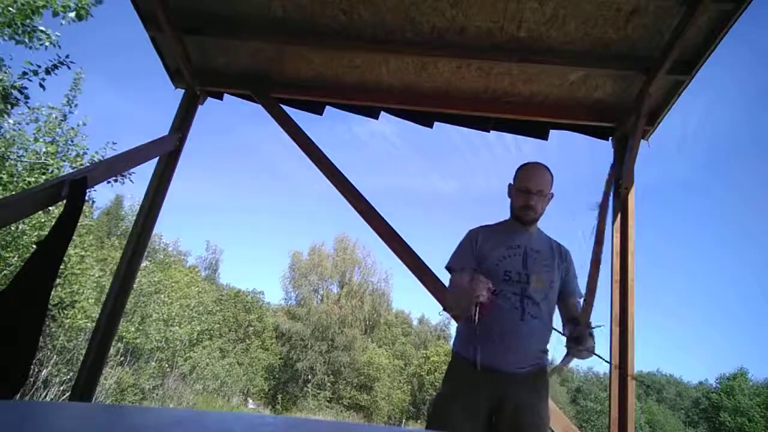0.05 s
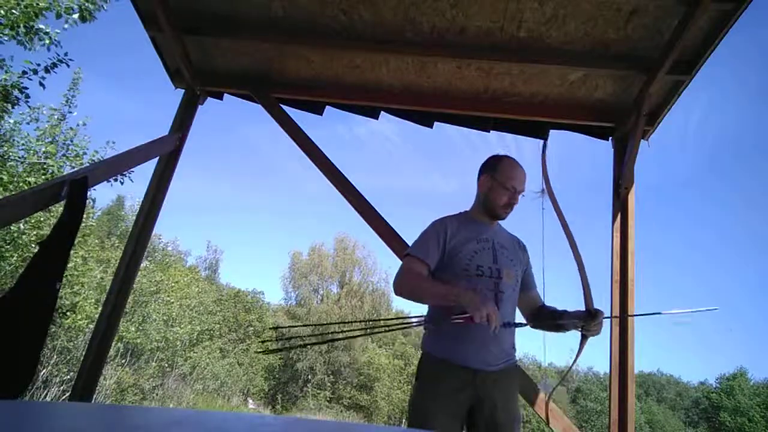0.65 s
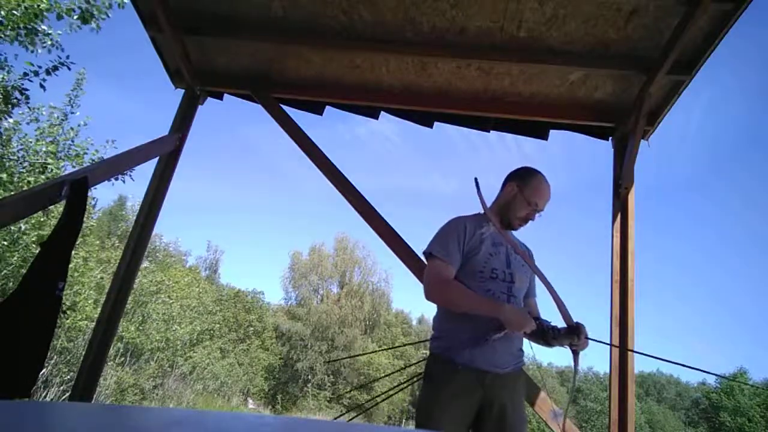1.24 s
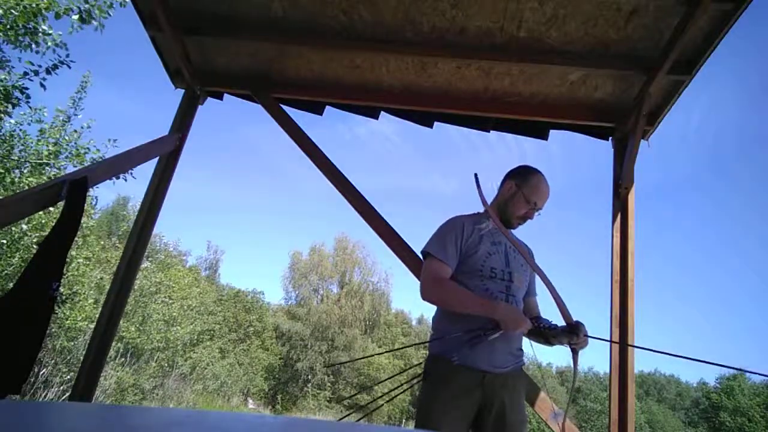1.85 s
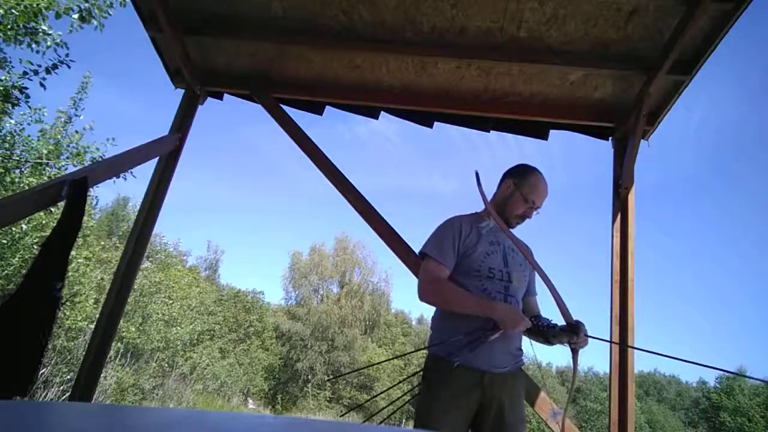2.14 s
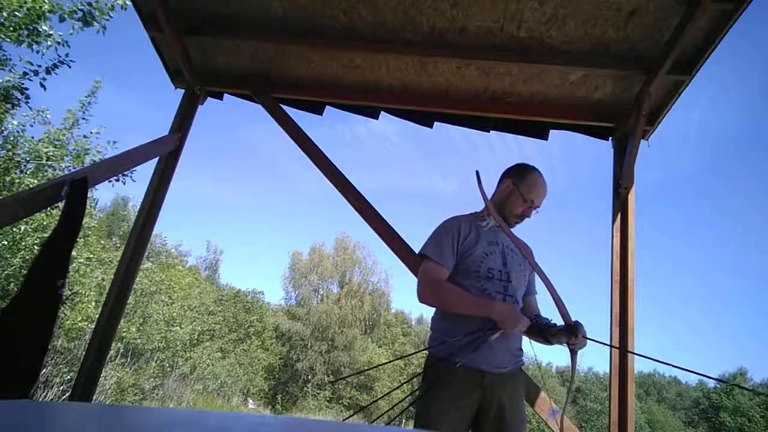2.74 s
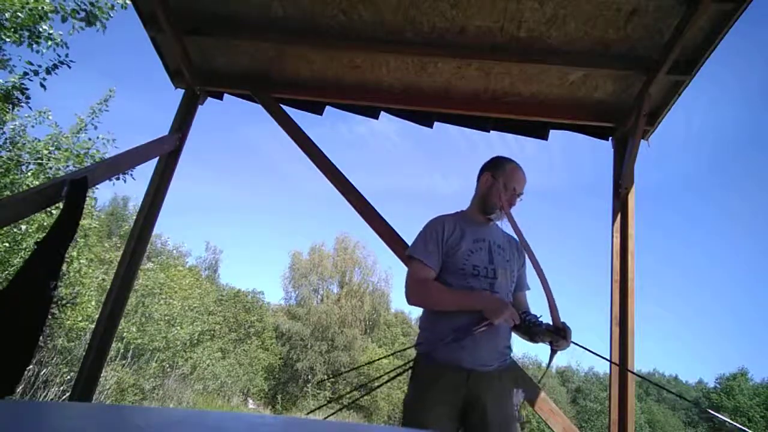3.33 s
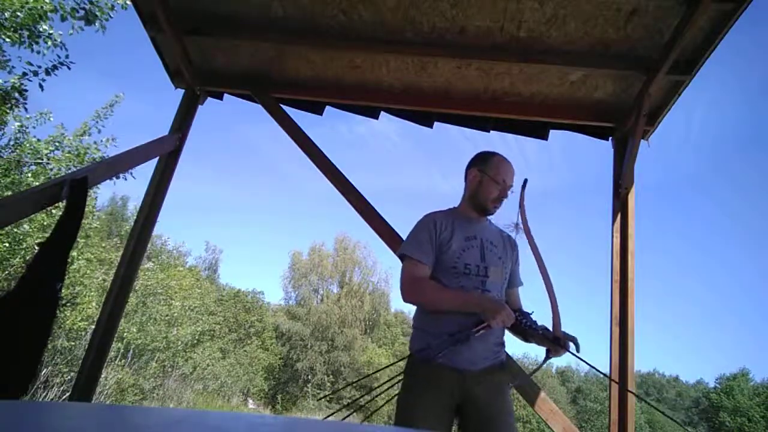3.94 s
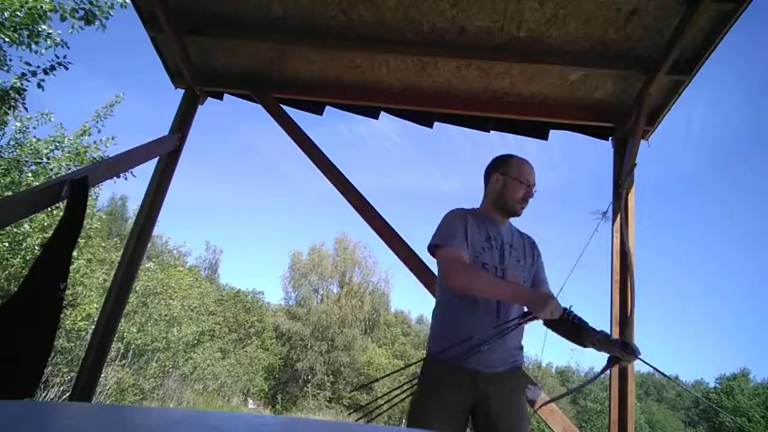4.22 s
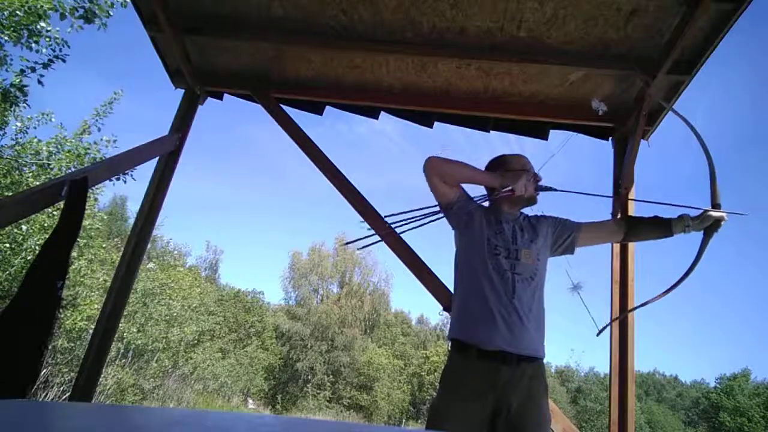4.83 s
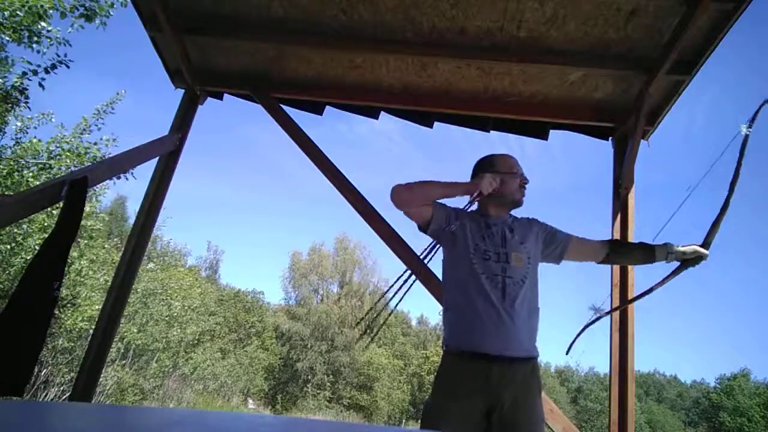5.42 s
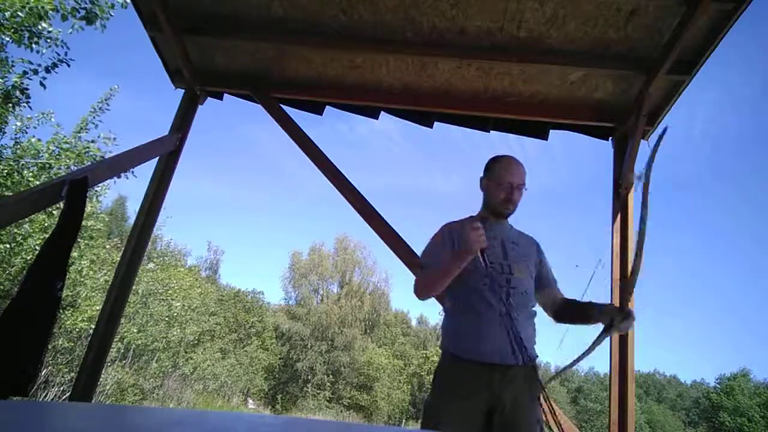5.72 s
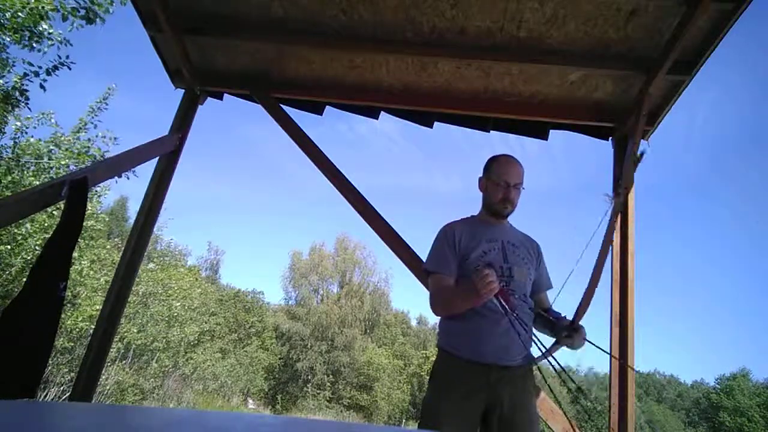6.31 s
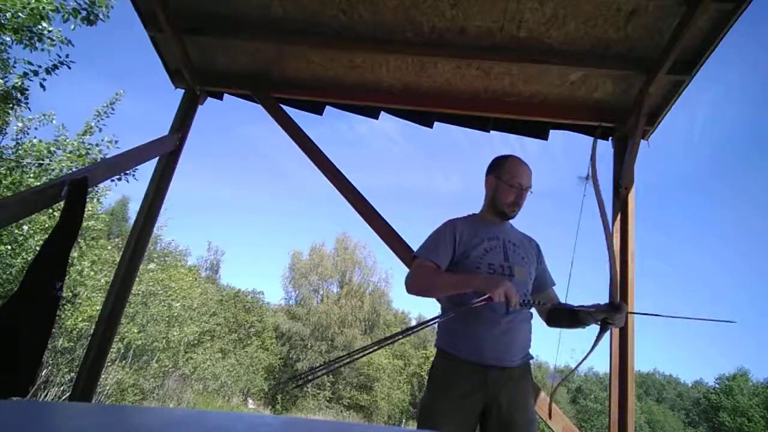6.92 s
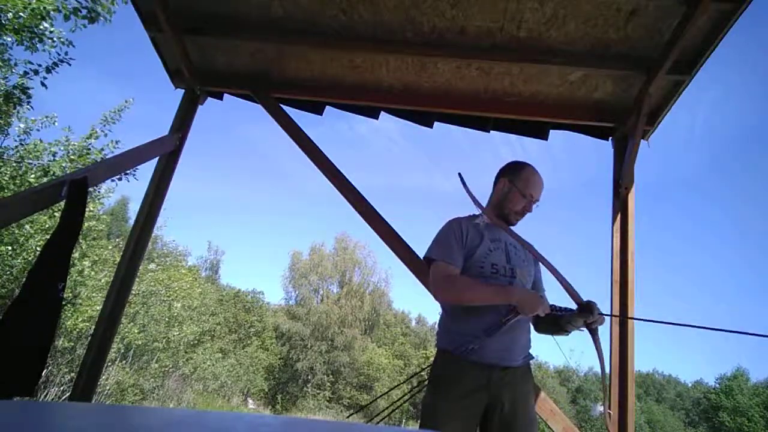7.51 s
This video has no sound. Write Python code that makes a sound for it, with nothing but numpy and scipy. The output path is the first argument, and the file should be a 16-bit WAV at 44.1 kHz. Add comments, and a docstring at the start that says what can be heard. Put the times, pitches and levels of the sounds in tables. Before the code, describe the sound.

An archer handles clicking arrows and shoots, the string slapping just before the hit, over faint birdsong and distant traffic.

```python
"""First come the clicks of spare arrows and the rustle of an archer's clothes, over far traffic and leaves.
A warbler whistles in the trees, with a fainter bird behind it. About five seconds in, he shoots from
under a wooden shelter: the string slaps, the bow rings, the feathers hiss and the arrow cracks into
a near target. The forest returns a dull echo. He takes the next arrow as a far engine picks up speed."""
import sys
import numpy as np
from scipy import signal
from scipy.fft import rfft, irfft, next_fast_len
from scipy.io import wavfile
from scipy.ndimage import uniform_filter1d

SR = 44100
rng = np.random.default_rng(int(sys.argv[2]) if len(sys.argv) > 2 else 0)


def pcm_store(signal):
    """Save signal as 16-bit PCM."""
    levels = np.round(np.clip(np.atleast_2d(signal), -1, 1) * 32767)
    wavfile.write(sys.argv[1], SR, levels.astype(np.int16).T)


N = 333468
TIME = np.arange(N) / SR
FFT_SIZE = next_fast_len(N, real=True)
FFT_HZ = np.fft.rfftfreq(FFT_SIZE, 1 / SR)


def gain_of(db):
    """Turns decibels into a number to multiply by."""
    return 10 ** (np.asarray(db) / 20)


def evened(x):
    """Scales a signal to an average (rms) level of 1."""
    return x / np.sqrt(np.mean(x ** 2) + 1e-20)


def look_up(points, hz):
    """Reads a table at any pitch, sliding between its rows."""
    pitch_hz, value = np.transpose(points)
    return np.interp(np.log(hz + 1), np.log(pitch_hz + 1), value)


def add(mix, start_s, sound):
    """Mixes a sound in at its start time."""
    part = mix[..., max(round(start_s * SR), 0):][..., :sound.shape[-1]]
    part += sound[..., :part.shape[-1]]


def panned(db):
    """Left and right gains; positive is to the left."""
    return gain_of([[db / 2], [-db / 2]])


def tinted(x, colour):
    """Makes each pitch louder or softer, as a colour table says."""
    return irfft(rfft(x, FFT_SIZE) * gain_of(look_up(colour, FFT_HZ)), FFT_SIZE)[..., :N]


def shortest_click(db):
    """The shortest click with these levels, from 0 Hz to half the sample rate."""
    log_gain = np.log(gain_of(np.r_[db, db[-2:0:-1]]))
    return np.fft.ifft(np.exp(np.conj(signal.hilbert(log_gain)))).real


# How alike left and right are (1 is the same): pitch_hz, likeness
LIKENESS = [(60, 0.99), (150, 0.85), (380, 0.83), (950, 0.15), (2380, -0.091), (5980, -0.17),
            (15000, -0.04)]
def wide_noise(colour):
    """Noise from all around, most alike on both sides in the bass."""
    left, other = rfft(rng.standard_normal((2, FFT_SIZE)))
    same = np.clip(look_up(LIKENESS, FFT_HZ), -1, 1)
    right = same * left + np.sqrt(1 - same ** 2) * other
    return evened(tinted(irfft(np.array([left, right]), FFT_SIZE), colour))


# The colours of traffic and of leaves: pitch_hz, level_db
TRAFFIC_COLOUR = [(22, -39.5), (32, -27), (42, -7.5), (60, 1), (90, -5), (130, -6.5), (170, -11),
                  (250, -16), (450, -18), (650, -17), (1000, -19.5), (1250, -25.5), (1550, -36.5),
                  (2200, -37.5), (3500, -69)]
LEAF_COLOUR = [(600, -7), (1500, -3.5), (2500, 3), (4000, 2), (7000, -5), (11000, -6.5), (16000, -2)]
# The shape of the traffic's rise and fall: time_s, level_db
TRAFFIC_SWELL = [(0.06, -64), (0.11, -57), (0.65, -62), (2.97, -60.5), (5.1, -63.5)]
def traffic_and_leaves(traffic_db=-48.5, swell_share=0.6, leaves_db=-66):
    """Far traffic swells gently under a faint hiss of leaves."""
    level_db = np.interp(TIME, *np.transpose(TRAFFIC_SWELL))
    swell_db = swell_share * (level_db - level_db.mean())
    traffic = gain_of(traffic_db + swell_db) * wide_noise(TRAFFIC_COLOUR)
    return traffic + gain_of(leaves_db) * wide_noise(LEAF_COLOUR)


ENGINE_START_S, ENGINE_ONSET_S, ENGINE_PEAK_S = 6.13, .42, 7.32
GROW_DB_PER_S, FADE_DB_PER_S = 14.5, 25
# The colours of the exhaust pipe and of the engine's roar: pitch_hz, level_db
EXHAUST_COLOUR = [(50, -4), (75, 1), (110, -18.5), (150, -14.5), (185, -19.5), (240, -32), (420, -27.5),
                  (650, -19)]
ROAR_COLOUR = [(100, -16), (300, -19), (420, -18), (500, -2), (560, -10.5), (640, 3), (740, -8.5),
               (900, -12.5), (1400, -29), (3000, -56)]
def engine(firing_hz=67.3, octaves_per_s=0.55, level_db=-36, roar_db=-17, flutter_db=3, harmonics=7):
    """A far engine fires ever faster; its tones climb through the pitches where the exhaust rings."""
    t = TIME - ENGINE_PEAK_S
    hz = firing_hz * 2 ** (octaves_per_s * t)
    level = gain_of(level_db + np.minimum(GROW_DB_PER_S * t, -FADE_DB_PER_S * t))
    level *= np.clip((TIME - ENGINE_START_S) / ENGINE_ONSET_S, 0, 1)
    turns, boom = np.cumsum(hz) / SR, np.zeros(N)
    for k in range(1, harmonics + 1):
        flutter = np.interp(TIME, np.linspace(0, TIME[-1], 80), rng.standard_normal(80)) * (k > 1)
        strength = gain_of(look_up(EXHAUST_COLOUR, k * hz) + flutter_db * flutter)
        boom += strength * np.sin(2 * np.pi * (k * turns + rng.random()))
    roar_level = gain_of(roar_db) * np.sqrt(level * level.max())  # grows more gently than the boom
    return np.sqrt(2) * level * boom + roar_level * wide_noise(ROAR_COLOUR)


WAVER, SLUR_WAVER = 0.012, 0.033  # wobble, as a share of the pitch
def whistle(hz, db, waver):
    """One thin, wavering bird note along a pitch curve."""
    progress = np.linspace(0, 1, len(hz))
    wobble = evened(uniform_filter1d(rng.standard_normal(SR), size=50))[:len(hz)]
    turns = np.cumsum(hz * (1 + waver * wobble)) / SR
    return gain_of(db) * 2 * np.sqrt(progress * (1 - progress)) * np.sin(2 * np.pi * turns)


def far_bird_notes(start_s=1.2, every_s=.11, length_s=.045, pitch_hz=3860, level_db=-66):
    """A bird further off sings short falling notes at chance times and pitches."""
    range_octaves, glide_octaves = .4, -.25
    notes = []
    for k, (when, height) in enumerate(rng.random((21, 2))):
        hz = pitch_hz * 2 ** (range_octaves * (2 * height - 1))
        notes.append((start_s + (k + when) * every_s, length_s, hz, level_db, glide_octaves, SLUR_WAVER))
    return notes


def scoop(length_s=.182, dip_share=.36, low_hz=2680, end_hz=3690, low_db=-64, end_db=-48):
    """A warbler note that dips, then swells as it climbs."""
    climb = ((np.linspace(0, 1, int(length_s * SR)) - dip_share) / (1 - dip_share)) ** 2
    return whistle(low_hz + (end_hz - low_hz) * climb, low_db + (end_db - low_db) * climb, WAVER)


PIP_START_S, PIP_EVERY_S, PIP_S, PIP_HZ, PIP_DB = 1.56, .139, .024, 3870, -58.5
FLICK_S, FLICK_HZ, FLICK_DB, FLICK_OCTAVES = 0.0219, 4200, -53, -0.388
SLUR_OCTAVES, BEND_OCTAVES = -.7, .05
# Quick falling chirps: start_s
FLICK_STARTS = [1.995, 2.189, 2.344, 2.441, 2.533, 2.632, 2.958]
# Long falling notes: start_s, length_s, first_pitch_hz, level_db
SLUR_NOTES = [(1.673, .05, 3300, -67), (2.736, .072, 4180, -56.5), (3.377, .093, 4000, -59)]
# Nearly flat whistles: start_s, length_s, pitch_hz, level_db
FLAT_NOTES = [(1.62, .03, 4500, -62), (1.801, .044, 5000, -65), (3.265, .035, 4060, -61),
              (3.563, 0.078, 3050, -61.5), (3.687, 0.11, 3360, -67), (3.94, 0.055, 2880, -61.5),
              (4.25, .08, 3270, -66), (4.412, 0.065, 2660, -65), (4.752, 0.053, 3020, -61)]
def birds(direct_db=-6, echo_db=-4, echo_s=.5):
    """A warbler's pips, flicks, slurs, scoop and whistles, and a far bird; the trees scatter both."""
    notes = [(PIP_START_S + k * PIP_EVERY_S, PIP_S, PIP_HZ, PIP_DB, 0, WAVER) for k in range(3)]
    notes += [(start_s, FLICK_S, FLICK_HZ, FLICK_DB, FLICK_OCTAVES, WAVER) for start_s in FLICK_STARTS]
    notes += [(*row, SLUR_OCTAVES, SLUR_WAVER) for row in SLUR_NOTES]
    notes += [(*row, 0, WAVER) for row in FLAT_NOTES]
    song = np.zeros(N)
    for start_s, length_s, hz, db, octaves, waver in notes + far_bird_notes():
        octaves += BEND_OCTAVES * rng.uniform(-1, 1)
        glide = 1 - np.linspace(1, 0, int(length_s * SR)) ** 1.3  # starts fast and eases off
        add(song, start_s, whistle(hz * 2 ** (octaves * glide), db, waver))
    add(song, start_s=2.828, sound=scoop())
    trees = rng.standard_normal((2, SR)) * gain_of(-60 * TIME[:SR] / echo_s)
    echo = signal.fftconvolve(song[None], trees / np.linalg.norm(trees[0]), axes=1)[:, :N]
    return gain_of(direct_db) * song + gain_of(echo_db) * echo


# The colour of the forest's echo: pitch_hz, level_db
FOREST_COLOUR = [(150, -25), (500, -2), (1000, 8.5), (1400, -3), (2200, -25), (5000, -44)]
def forest_echo(x, delay_s=0.421, level_db=-28, smear_s=.009):
    """The shot comes back dull from the edge of the forest."""
    out = np.zeros((2, N))
    trunks = rng.standard_normal((2, SR)) * np.exp(-TIME[:SR] / smear_s)
    add(out, delay_s, signal.fftconvolve(x.mean(0)[None], trunks / np.linalg.norm(trunks[0]), axes=1))
    return gain_of(level_db) * tinted(out, FOREST_COLOUR)


def from_right(x, late_samples=6):
    """The archer stands to the right, so his sound reaches the left side late."""
    return np.array([np.roll(x[0], late_samples), x[1]])


# How long sound under the roof takes to fade by 60 dB: pitch_hz, fade_s
SHELTER_FADE = [(100, .16), (400, .19), (1000, .18), (2400, .16), (8000, .165), (16000, .13)]
# The colour of sound bouncing off the boards: pitch_hz, level_db
BOARD_COLOUR = [(80, -9.5), (300, 1), (1000, 2), (2200, -0.5), (3600, -6), (6000, -3), (9000, -0.5),
                (15000, -1)]
def shelter(x, scatter_db, roof_s=.0095, roof_db=-10, build_s=0.0026, woods_db=-33, woods_fade_s=.7):
    """A slap from the roof, a short scatter among posts and boards, and a faint return from the woods."""
    t = TIME[:SR]
    bounces = rng.standard_normal((2, SR)) * (rng.random((2, SR)) < .15)
    hz, frame_s, bands = signal.stft(bounces, SR, nperseg=128)
    fade = gain_of(-60 * frame_s / look_up(SHELTER_FADE, hz)[:, None])
    scatter = signal.istft(bands * fade, SR, nperseg=128)[1][:, :SR]
    scatter *= 1 - np.exp(-(t / build_s) ** 2)
    woods = rng.standard_normal((2, SR)) * gain_of(-60 * t / woods_fade_s) * np.minimum(t / .03, 1)
    room = gain_of(scatter_db) * scatter / np.linalg.norm(scatter[0])
    room += gain_of(woods_db) * woods / np.linalg.norm(woods[0])
    add(room, roof_s, gain_of(roof_db) * panned(1.4))
    echoes = signal.fftconvolve(x.mean(0)[None], room, axes=1)[:, :N]
    return from_right(x) + tinted(echoes, BOARD_COLOUR)


# He loads an arrow, raises the bow, draws, lowers it and reloads: start_s, length_s, level_db
ARM_MOVES = [(-.15, 0.16, -48.5), (0.038, 0.52, -61), (0.54, 0.74, -70), (2.898, 0.43, -68),
             (3.36, 1.12, -70.5), (4.45, 0.54, -69), (5.34, 0.4, -70.5), (6.167, 0.62, -66.5),
             (6.8, 0.66, -70)]
def arm_motion(rise_s=0.085, fall_s=0.11):
    """How hard the arms move: each movement sets in, holds and dies away."""
    motion = np.zeros(N)
    for start_s, length_s, db in ARM_MOVES:
        rise = (TIME - start_s) / rise_s
        fall = (start_s + length_s - TIME) / fall_s + .5
        motion += gain_of(db) * np.clip(np.minimum(rise, fall), 0, 1)
    return motion


# The colour of rubbing cloth: pitch_hz, level_db
CLOTH_COLOUR = [(500, -27), (1800, -2), (3500, -4), (5500, -6), (8000, -0.5), (11000, -2.5), (15500, -5)]
def clothes_rustle(grain_db=2.5, boost_db=3, catch_s=0.0083):
    """Fibres catch and let go, harder as the arms move."""
    catches = evened(signal.lfilter([1], [1, -np.exp(-1 / (catch_s * SR))], rng.standard_normal(N)))
    rub = evened(tinted(rng.standard_normal((3, N)) * gain_of(grain_db * catches), CLOTH_COLOUR))
    stereo = 0.53 * panned(3.2) * rub[0] + rub[1:]  # one shared rub, plus one for each side
    return gain_of(boost_db) * arm_motion() * evened(from_right(stereo))


def scuffs(rows, stereo_spread=0.92, size=16384):
    """Brief contacts: each is a burst of tiny slips, strongest around one pitch."""
    out, hz = np.zeros((2, N)), np.fft.rfftfreq(size, 1 / SR)
    for start_s, length_s, db, pitch_hz, octaves, pan_db in rows:
        n = int(np.clip(length_s * SR, 8, size))
        band_db = -40 * np.log10(1 + (np.log2((hz + 1) / pitch_hz) / octaves / 2) ** 2)
        slips = irfft(rfft(rng.standard_normal((3, size))) * gain_of(band_db))[:, :n]
        burst = (slips[0] + stereo_spread * slips[1:]) * signal.windows.tukey(n, .5)
        add(out, start_s, gain_of(db) * panned(pan_db) * burst / burst.std(1, keepdims=True))
    return out


def chance_taps(count=32, per_s=3, boost_db=21, spread_db=1, brightness=4):
    """The spare arrows touch by chance, as hard as the movement that shakes them."""
    when, force = rng.random((count, 2)).T
    starts_s = (np.arange(count) + when) / per_s
    motion_db = 20 * np.log10(np.interp(starts_s, TIME, arm_motion()) + 1e-9)
    levels_db = motion_db + boost_db + spread_db * (2 * force - 1)
    return [(start_s, db, 0, brightness) for start_s, db in zip(starts_s, levels_db)]


# Arrows knocking together: start_s, level_db, pan_db, brightness_db_per_octave
ARROW_TAPS = [(0.1183, -38, -7, -8), (0.308, -30, 8, 9.5), (.316, -33.5, 5, .5), (1.887, -37, 13, 12),
              (2.6618, -48.5, -4, 8), (2.8429, -45, -2, 12), (4.376, -45, -1, 4), (4.9928, -45.5, 7, 7),
              (5.9467, -39.5, 5, 9), (6.3307, -19, 4, -2), (6.5032, -36.5, 4, 10), (6.593, -36, 0, 12),
              (6.6253, -37.5, 6, 3), (6.671, -36.5, -8, 10), (6.706, -44, 8, -5.5)]
# The colour of an arrow's shaft: pitch_hz, level_db
SHAFT_COLOUR = [(300, -30), (1300, -22), (1900, -8.5), (2500, -4.5), (3600, -2.5), (4300, 1), (5200, 0),
                (6200, 0), (8000, -2), (11000, -7), (16000, -10)]
# Shafts sliding on each other and the bow, and one brief ring of a shaft after the tap at 0.308 s: start_s,
# length_s, level_db, pitch_hz, width_octaves, pan_db
ARROW_SLIDES = [(.115, 0.18, -60.5, 2400, 3.8, 0), (.36, 0.057, -56, 2600, 2, -1),
                (.308, 0.012, -49, 4870, 0.22, 8.5), (4.55, 0.32, -75, 13200, 0.37, -11),
                (5.945, 0.045, -59.5, 8040, 0.97, 1), (6.25, 0.11, -58, 9100, 1.1, -4),
                (6.335, 0.11, -63, 4240, 1.6, -2), (6.61, 0.11, -61.5, 7000, 1.6, 0)]
def arrow_handling(chatter_s=.0007, boost_db=11, size=1024):
    """Arrows tap and slide; each tap is a tiny rattle coloured by the shaft."""
    out, t, hz = np.zeros((2, N)), TIME[:size], np.fft.rfftfreq(size, 1 / SR)
    for start_s, db, pan_db, brightness in ARROW_TAPS + chance_taps():
        shaft = shortest_click(look_up(SHAFT_COLOUR, hz) + brightness * np.log2(hz + hz[1]))
        tap = signal.fftconvolve(rng.standard_normal(size) * np.exp(-t / chatter_s), shaft)
        add(out, start_s, gain_of(db + boost_db) * panned(pan_db) * tap / np.linalg.norm(tap))
    return out + scuffs(ARROW_SLIDES)


# The colour of feathers rushing through air: pitch_hz, level_db
FEATHER_COLOUR = [(400, -5.5), (2000, 3), (5000, 0.5), (9000, 1), (15000, 7)]
def arrow_flight(start_s=5.2, length_s=.145, level_db=-47, fade_db=10):
    """The feathers hiss, fading as the arrow flies to the target."""
    progress = np.clip((TIME - start_s) / length_s, 0, 1)
    soft_ends = np.minimum(8 * np.minimum(progress, 1 - progress), 1)
    return gain_of(level_db - fade_db * progress) * soft_ends * wide_noise(FEATHER_COLOUR)


def ring(tones, start_s, rise_s):
    """A struck body: its tones swell during the push, then each drops 60 dB in its fade time."""
    out, t = np.zeros((2, N)), TIME[:SR]
    sound = sum((-1) ** k * gain_of(db - 60 * t / fade_s) * np.sin(2 * np.pi * hz * t)
                for k, (hz, db, fade_s) in enumerate(tones))
    add(out, start_s, sound * (1 - np.exp(-t / rise_s)))
    return out


# Pushes of air from the bow's arms and the target's face: middle_s, level_db, pitch_hz, cycles, pan_db
AIR_PUSHES = [(5.182, -15, 1056, 1.5, 12), (5.188, -29.5, 272.6, 2.8, -1.5), (5.3461, -22, 635, 0.76, -10),
              (5.356, -23.5, 103, 1.2, 3)]
def air_thumps():
    """Each push is a swing or two of air pressure."""
    out, half_s = np.zeros((2, N)), TIME[SR // 16]
    for middle_s, db, hz, cycles, pan_db in AIR_PUSHES:
        turns = (TIME[:SR // 8] - half_s) * hz
        swing = np.sin(2 * np.pi * turns) * np.exp(-(2 * turns / cycles) ** 2)
        add(out, middle_s - half_s, gain_of(db) * panned(pan_db) * swing)
    return out


# The arrow going in: start_s, length_s, level_db, pitch_hz, width_octaves, pan_db
HIT_SCUFFS = [(5.3437, .0025, -28, 5800, 1.3, -3), (5.3445, .003, -30, 2300, .3, -2),
              (5.349, .018, -33, 400, 1.1, 0), (5.3505, .009, -32.5, 2330, .14, 4),
              (5.3505, .008, -40, 3700, .1, 2)]
# The tones of the target: pitch_hz, level_db, fade_s
TARGET_TONES = [(70, -31, 0.2), (109, -34.5, .07), (173, -26, 0.043), (360, -33.5, 0.038),
                (740, -48, 0.049)]
def target_hit():
    """The point pierces the target, the shaft drives in and the target thuds."""
    return scuffs(HIT_SCUFFS) + ring(TARGET_TONES, start_s=5.3505, rise_s=0.006)


# The string and arrow letting go: start_s, length_s, level_db, pitch_hz, width_octaves, pan_db
SHOT_SCUFFS = [(5.161, 0.0051, -43.5, 7970, 1.6, -3), (5.1662, 0.0018, -23, 5800, 0.35, 2.5),
               (5.1664, 0.0062, -24.5, 2003, 4.6, -1.5), (5.1695, 0.024, -33, 6410, 0.92, -2),
               (5.1735, 0.011, -19, 3766, 0.17, 1), (5.1735, 0.0064, -35, 900, 0.57, 0),
               (5.1785, 0.0036, -13, 7600, 1.6, 1), (5.179, 0.0095, -21.5, 1190, 0.89, -1.5),
               (5.1878, .0025, -22, 6700, .5, 11)]
# The tones of the bow's arms and string: pitch_hz, level_db, fade_s
BOW_TONES = [(135, -36, .12), (221, -38, .33), (303, -25, .11), (328, -42, .55), (581, -28, .08),
             (668, -33.5, .19), (861, -37, .07), (1010, -27, .06), (1135, -30, .07), (1363, -31, .07),
             (1655, -31, .06), (3605, -28, .05), (3985, -31, .045), (6066, -29, .05)]
def bow_shot():
    """The string slips off the fingers, the shaft scrapes by, the string slaps home and jolts the bow."""
    return scuffs(SHOT_SCUFFS) + ring(BOW_TONES, start_s=5.1805, rise_s=0.0022)


def scene():
    """The shot and the handling of the arrows under the shelter, with the outdoors around them."""
    shot, hit, arrows = bow_shot(), target_hit(), arrow_handling()
    archer = shelter(shot, scatter_db=-3)
    archer += shelter(hit + air_thumps(), scatter_db=-9, roof_db=-13)
    archer += shelter(arrows, scatter_db=2, roof_s=0.0055)
    archer += forest_echo(shot) + arrow_flight() + clothes_rustle()
    return archer + birds() + engine() + traffic_and_leaves()


# How the microphone's two openings differ in the treble: pitch_hz, left_minus_right_db
MIC_BALANCE = [(2400, 0.5), (4500, 1.5), (6000, 6), (7500, 3.5), (9200, 6), (11000, -1.5), (13000, 0),
               (15500, -6.5)]
def record(dry, left_share=0.66, top_hz=15950):
    """Each side gets its own colour; peaks clip at full scale and the highest treble is cut."""
    left = tinted(dry[0], [(hz, db * left_share) for hz, db in MIC_BALANCE])
    right = tinted(dry[1], [(hz, db * (left_share - 1)) for hz, db in MIC_BALANCE])
    low_pass = signal.firwin(511, top_hz, window=("kaiser", 9), fs=SR)
    return signal.oaconvolve(np.clip([left, right], -1, 1), low_pass[None], "same")


dry = scene()
out = record(dry)
pcm_store(out)
```